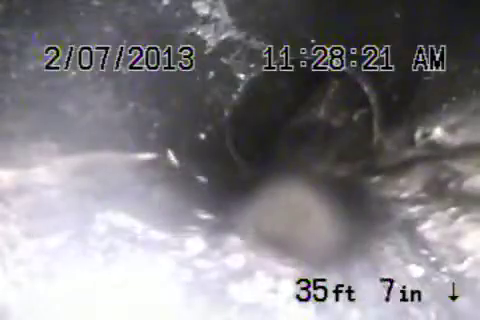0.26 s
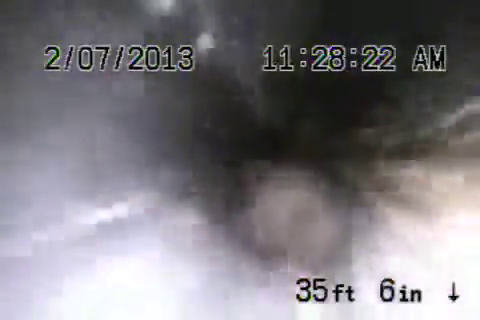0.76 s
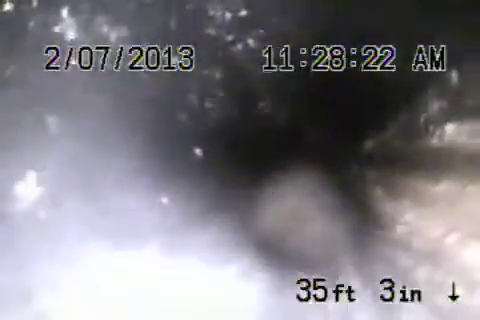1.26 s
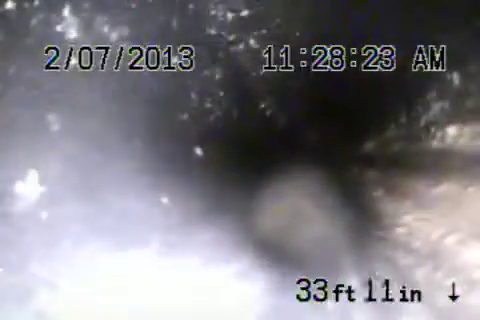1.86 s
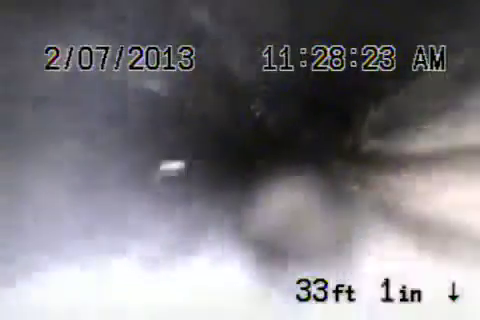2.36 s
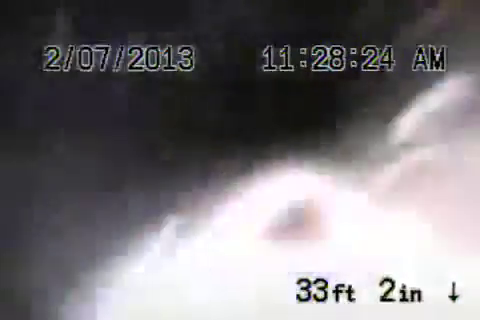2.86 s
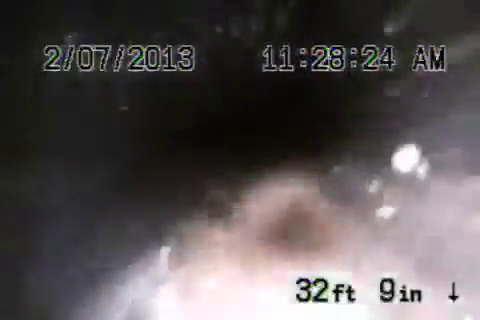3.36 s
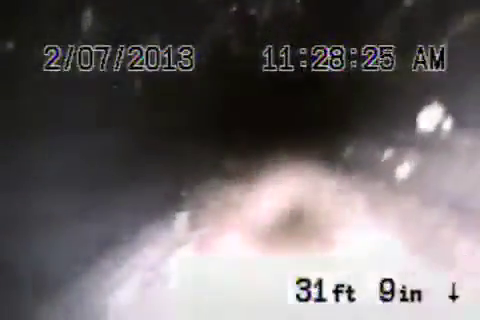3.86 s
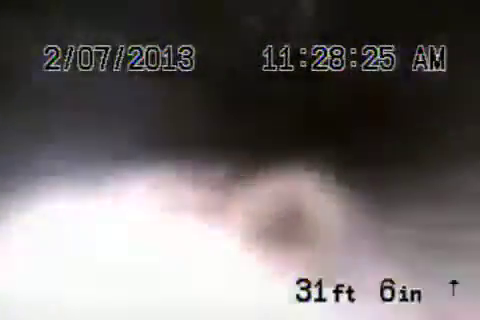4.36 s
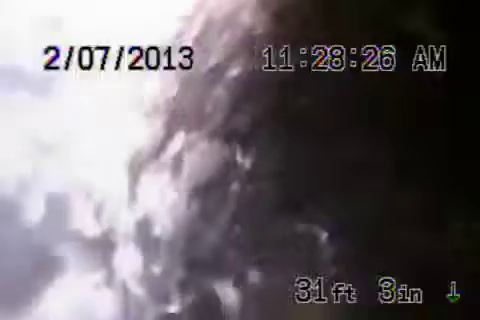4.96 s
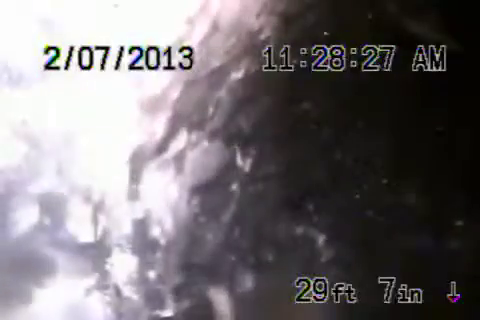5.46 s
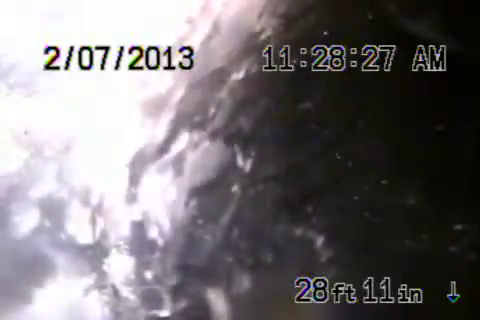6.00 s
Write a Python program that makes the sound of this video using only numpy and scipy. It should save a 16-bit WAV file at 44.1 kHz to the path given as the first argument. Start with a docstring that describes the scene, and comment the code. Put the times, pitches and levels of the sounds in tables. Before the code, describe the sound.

A push cable is pulled back out of a pipe in a hard room. It knocks against its reel with hollow, ringing clunks and rubs along with light taps between them. The knocks bunch into a loud clatter with a brief scrape near the middle, then come more sparsely. A low machine hum and faint electronic hiss continue throughout, all picked up in mono.

```python
"""A push cable, pulled back out of a pipe, knocks against its reel and rubs along in a hard room.
Each impact excites the reel's damped modes, which ring hollowly in a dense clatter; stick-slip
friction makes the rubbing noise. The strongest tugs set off a very low sway.
Behind it a machine hums steadily, and the electronics hiss faintly."""
import sys
import numpy as np
from scipy import signal
from scipy.fft import rfft, irfft
from scipy.io import wavfile

SR = 44100
rng = np.random.default_rng(int(sys.argv[2]) if len(sys.argv) > 2 else 0)


def unload_wav(signal):
    """Save mono or channel-first audio to the path in sys.argv[1] as 16-bit WAV at rate SR, clipped to [-1, 1]."""
    wavfile.write(
        sys.argv[1],
        SR,
        np.round(np.clip(np.atleast_2d(signal).T, -1, 1) * 32767).astype(np.int16),
    )


N = 274872
T = np.arange(N) / SR


def amp(db):
    return 10 ** (np.asarray(db) / 20)


def unit_rms(x):
    return x / np.sqrt(np.mean(x ** 2) + 1e-20)


def add(mix, start_s, sound):
    part = mix[max(round(start_s * SR), 0):][:len(sound)]
    part += sound[:len(part)]


def noise(colour):
    """Spectral shaping: white noise is filtered to the given colour and scaled to rms 1."""
    hz, db = np.transpose(colour)
    shape = amp(np.interp(np.log(np.fft.rfftfreq(N, 1 / SR) + 1), np.log(hz + 1), db))
    return unit_rms(irfft(rfft(rng.standard_normal(N)) * shape, N))


def waver(rate_hz):
    """Random modulation: low-passed noise gives a slow drift of rms 1."""
    lowpass = np.exp(-(np.fft.rfftfreq(N, 1 / SR) / rate_hz) ** 2)
    return unit_rms(irfft(rfft(rng.standard_normal(N)) * lowpass, N))


def hiss(level_db=-55, flutter_db=1.48):
    """Electronic noise: amplitude modulation gives it a slight buzz and a random flutter."""
    # The spectrum of the hiss. Each row: frequency in Hz, relative density in dB.
    colour = [(200, 16.5), (700, 2.5), (1200, 5), (1800, 5.5), (2300, 8), (2900, 2), (5000, 1.5),
              (7500, 0.5), (10800, 2), (13000, 0.5), (15800, -1.5)]
    buzz = 1 + .25 * np.cos(np.pi * 30 * T) ** 40 + .12 * np.cos(np.pi * 60 * T) ** 16  # 30 and 60 Hz
    return amp(level_db + flutter_db * waver(54)) * unit_rms(noise(colour) * buzz)


def machine_hum(slide, waver_db=4.5, drift_turns=0.15, drone_db=-37, rumble_db=-14, rumble_growth=0.45):
    """Superposition: wavering machine tones lie in a boomy drone, to which sliding adds rumble."""
    # The machine's tones. Each row: frequency in Hz, median rms level in dB.
    partials = [(69.5, -45.5), (119, -49.5), (144, -56.5), (163, -61), (247, -72)]
    # The spectrum of the drone. Each row: frequency in Hz, relative density in dB.
    colour = [(8, 12.5), (16, 5.5), (32, 2), (52, -12), (67, 9.5), (84, -7), (100, -1.5), (116, 2),
              (132, 4.5), (146, -5.5), (165, -1), (200, -12), (280, -39), (600, -50.5)]
    tones = np.zeros(N)
    for hz, db in partials:
        level = amp(db + waver_db * waver(21))
        tones += level * np.sin(2 * np.pi * (hz * T + drift_turns * waver(1.8)))
    rumble = amp(rumble_db) * slide ** rumble_growth  # grows more slowly than the rubbing
    return np.sqrt(2) * tones + np.hypot(amp(drone_db), rumble) * noise(colour)


def sway(swing_hz=6.0, swing_s=0.094, shudder_hz=19.6, shudder_db=-5, shudder_s=0.061,
         tremble_hz=24, tremble_db=-19, tremble_t60=3.3):
    """Transient response: a tug gives one slow swing, a quicker shudder and a damped tremble."""
    # The strongest tugs. Each row: centre time in seconds, size in dB, direction as +1 or -1.
    tugs = [(0.186, -9, 1), (0.589, -11.5, -1), (2.083, -7.5, 1), (2.506, -9.5, -1), (3.923, -22.5, 1),
            (4.355, -14.5, -1)]
    out = np.zeros(N)
    for centre_s, db, direction in tugs:
        t = T - centre_s
        after = np.maximum(t, 0)
        swing = np.sin(2 * np.pi * swing_hz * t) * np.exp(-(t / swing_s) ** 2)
        shudder = np.cos(2 * np.pi * shudder_hz * t) * np.exp(-(t / shudder_s) ** 2)
        envelope = np.tanh(after / shudder_s) ** 2 * amp(-60 * after / tremble_t60)
        tremble = np.sin(2 * np.pi * tremble_hz * after) * envelope
        out += direction * amp(db) * (swing + amp(shudder_db) * shudder + amp(tremble_db) * tremble)
    return out


def sliding(creep_db=-56, rise_s=0.11, sag_db=-8, stop_s=0.24):
    """Incoherent addition: the cable's slides and its steady creep sum in power to one gain curve."""
    # The cable's slides. Each row: start in seconds, length in seconds, level in dB before the sag.
    slides = [(0.566, 1.5, -47), (1.937, 0.84, -45.5), (2.404, 0.096, -25), (2.59, 0.79, -44.5),
              (4.33, 0.27, -42), (4.94, 0.22, -42)]
    power = amp(creep_db) ** 2
    for start_s, length_s, db in slides:
        t = np.maximum(T - start_s, 0)
        onset = np.minimum(t / rise_s, 1)
        slowing = amp(db + sag_db * t / length_s)
        stop = np.exp(-np.maximum(t - length_s, 0) / stop_s)
        power = power + (onset * slowing * stop) ** 2
    return np.sqrt(power)


def rubbing(slide, rub_db=1.0, catch_db=2, catch_hz=22):
    """Stick-slip friction: the noise fluctuates as the sliding cable catches and slips."""
    # The spectrum of the rubbing. Each row: frequency in Hz, relative density in dB.
    colour = [(150, 7), (270, 1.5), (335, 1), (440, 1), (570, -1), (720, 0), (830, -12.5), (1200, -13),
              (1700, -25.5), (3000, -43), (6000, -54)]
    return amp(rub_db + catch_db * waver(catch_hz)) * slide * noise(colour)


def reel_impact(db, rise_s, boom_db, bright_db, spot_hz, spot_db, spot_octaves=0.26,
                bass_hz=220, body_hz=700, ring_db=-3, scatter_db=1, clatter_db=-2.5,
                room_db=-23, room_t60=0.91, contact_db=2, contact_s=0.0061):
    """Modal resonance: a blow rings the reel in a dense clatter; reverberation adds a weaker tail."""
    # The reel's modes. Each row: frequency in Hz, relative level in dB, 60 dB decay time in seconds.
    modes = [(112.9, -1, 0.45), (145.1, -8, 0.52), (157.9, -9, 0.67), (213, -11, 0.38), (311, -16.5, 0.6),
             (326.7, -8, 0.5), (334.5, -15, 0.22), (415.4, -9, 0.38), (443, -25, 0.54), (536, -3, 0.21),
             (569, -12.5, 0.39), (598.6, -2.5, 0.19), (637.4, -14, 0.38), (700, -7, 0.27),
             (753, -10.5, 0.18), (798, -43, 0.38), (845, -18.5, 0.47), (940, -10, 0.26), (930, -26, 0.16),
             (1025, -13, 0.2), (1147, -21, 0.32), (1282, -26, 0.14), (1392, -20, 0.3), (1430, -29, 0.24),
             (1454, -14, 0.14), (1636, -19.5, 0.26), (1604, -39, 0.078), (1785, -15.5, 0.11),
             (2630, -26, 0.15), (2884, -20.5, 0.11)]
    # The clatter's bands. Each row: centre in Hz, relative level in dB, 60 dB decay time in seconds.
    bands = [(72, -11.5, 0.13), (153, -8, 0.31), (244, -33, 0.21), (385, -4.5, 0.35), (674, -12, 0.28),
             (977, -16.5, 0.34), (1920, -19.5, 0.26), (2750, -28, 0.31), (4660, -34, 0.2),
             (7240, -44.5, 0.14), (11900, -55, 0.12)]
    t = np.arange(SR) / SR
    swell = 1 - np.exp(-t / rise_s)

    def force(hz):
        """Excitation spectrum: heavy blows push the bass, hard ones the treble, the spot one range."""
        boom = boom_db / (1 + (hz / bass_hz) ** 4)
        treble = bright_db * np.log2(max(hz / body_hz, 1))
        spot = spot_db * np.exp(-(np.log2(hz / spot_hz) / spot_octaves) ** 2)
        return amp(db + boom + treble + spot)

    out = np.zeros(SR)
    for k, (hz, mode_db, t60) in enumerate(modes):
        size, detune = rng.standard_normal(2)
        ring = np.sin(2 * np.pi * hz * (1 + 0.0055 * detune) * t) * amp(-60 * t / t60)
        polarity = (-1) ** k  # neighbouring modes swing in opposite senses
        out += polarity * force(hz) * amp(ring_db + mode_db + scatter_db * size) * ring
    log_hz = np.log(np.fft.rfftfreq(SR, 1 / SR) + 1)
    log_centres = np.log([30] + [row[0] for row in bands] + [SR / 2])
    white = rfft(rng.standard_normal(SR))
    room = amp(room_db - 60 * t / room_t60)
    for (hz, band_db, t60), share in zip(bands, np.eye(len(log_centres))[1:]):
        band = irfft(white * np.sqrt(np.interp(log_hz, log_centres, share)), SR)  # the bands overlap
        contact = amp(contact_db) * hz / (hz + body_hz) * np.exp(-t / contact_s)  # short and bright
        fade = np.hypot(amp(-60 * t / t60), room) + contact
        band /= np.sqrt(np.average(band ** 2, weights=(swell * fade) ** 2))  # rms 1 where it is heard
        out += force(hz) * amp(clatter_db + band_db) * band * fade
    return out * swell


def taps(slide, per_second=7.1, tap_db=-3.5, spread_db=3.5):
    """Random excitation: the moving cable brushes the reel, harder while it slides fast."""
    out = np.zeros(N)
    for k, (when, softness, spot) in enumerate(rng.random((round(per_second * N / SR), 3))):
        start_s = (k + when) / per_second
        db = tap_db + spread_db * (1 - 2 * softness)
        spot_hz = 580 * 2 ** (spot - .5)
        tap = reel_impact(db, rise_s=0.0068, boom_db=6, bright_db=-3, spot_hz=spot_hz, spot_db=7.5)
        add(out, start_s, np.interp(start_s, T, slide) * tap)
    return out


def knocks(spot_db=7.5, spot_growth=0.11):
    """Impact excitation: the cable strikes the reel; the struck spot colours softer blows more."""
    # The cable's blows. Each row: start in seconds, strength in dB, rise time in seconds, bass boost
    # in dB, treble slope in dB per octave, frequency in Hz that the struck spot favours.
    blows = [(.348, -21.5, 0.0031, 9.5, 3, 370), (.361, -18.5, 0.0049, 7.5, 1, 587),
             (0.548, -30.5, 0.025, 3.5, -6, 564), (.862, -47.5, 0.0046, 1, -2, 546),
             (1.022, -35, 0.0032, 9.5, -4, 520), (1.389, -44.5, 0.031, 26, -13, 414),
             (1.476, -36, 0.0056, -3, -4, 680), (1.866, -37.5, 0.017, 9.5, -3, 540),
             (1.905, -32, 0.024, -22, 0, 613), (2.092, -23, 0.0088, -2.5, 0.5, 610),
             (2.111, -31, 0.016, 8, -3.5, 164.5), (2.225, -33, 0.014, -5, -4.5, 740),
             (2.318, -36, 0.0075, -7, -2.5, 567), (2.379, -27, 0.0036, 0, 2.5, 443),
             (2.389, -19.5, 0.0076, 2, 4, 794), (2.447, -20, 0.053, 8, 4, 525),
             (2.565, -30, 0.0066, 8, -4, 1380), (2.959, -39.5, 0.025, 20.5, -14, 667),
             (3.058, -30, 0.0017, -12, -3.5, 570), (3.093, -35, 0.0027, 7.5, -5, 149),
             (3.272, -41, 0.0059, 4, 0.5, 725), (4.174, -21, 0.015, 6.5, 1, 620),
             (4.314, -40, 0.0038, 11.5, -28, 150), (4.497, -34.5, 0.045, 5, -1, 780),
             (4.706, -39, .015, -10, -14, 800), (4.795, -40, 0.032, 6, -5, 387),
             (5.026, -29, 0.024, -7, 1, 330), (5.056, -28.5, 0.0057, 9, 4.5, 112),
             (5.068, -30, 0.0025, -11, 2, 720), (5.776, -37, 0.012, 10, 1.5, 428),
             (5.793, -39.5, .004, 13.5, 0.5, 1560)]
    hardest_db = max(row[1] for row in blows)
    out = np.zeros(N)
    for start_s, db, *timbre in blows:
        add(out, start_s, reel_impact(db, *timbre, spot_db + spot_growth * (hardest_db - db)))
    return out


def scene():
    """Superposition: all sources add in one channel; the sliding drives rumble, rubbing and taps."""
    slide = sliding()
    return (machine_hum(slide) + hiss() + rubbing(slide) + sway() + knocks() + taps(slide))[None]


def record(dry, cutoff_hz=15900):
    """Band limiting: a steep low-pass filter removes the highest treble."""
    lowpass = signal.firwin(511, cutoff_hz, window=("kaiser", 9), fs=SR)
    return signal.oaconvolve(dry, lowpass[None], "same")


dry = scene()
out = record(dry)
unload_wav(out)
```